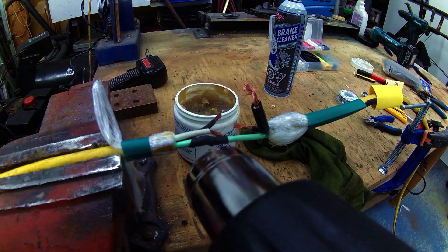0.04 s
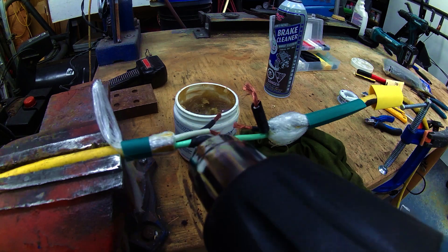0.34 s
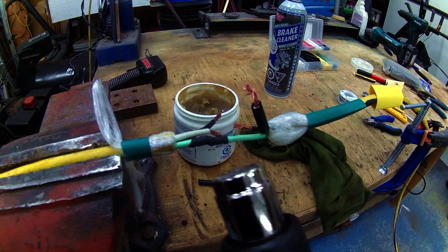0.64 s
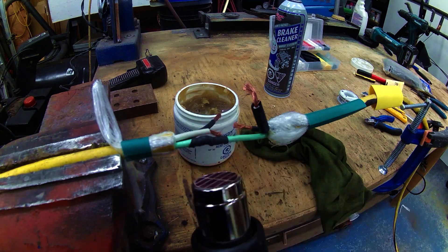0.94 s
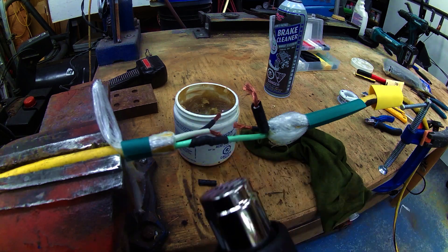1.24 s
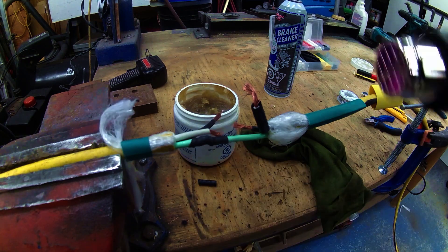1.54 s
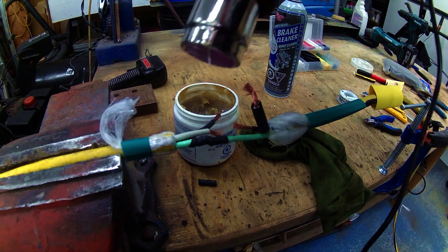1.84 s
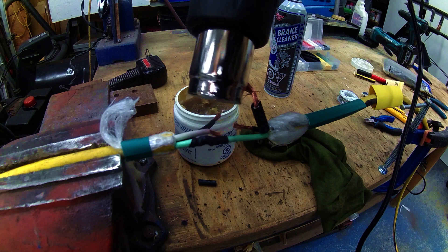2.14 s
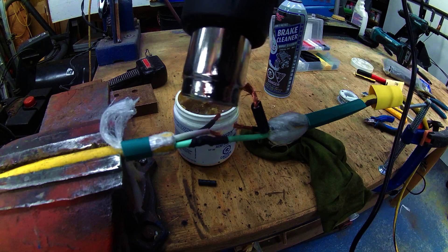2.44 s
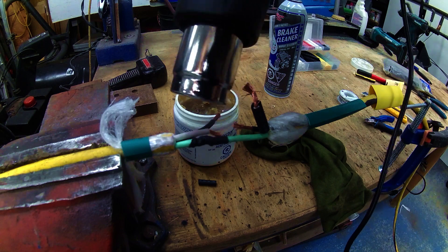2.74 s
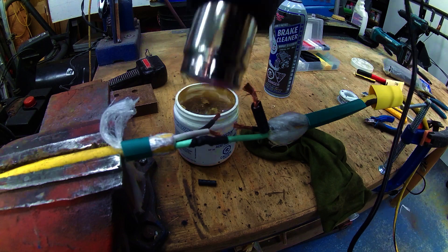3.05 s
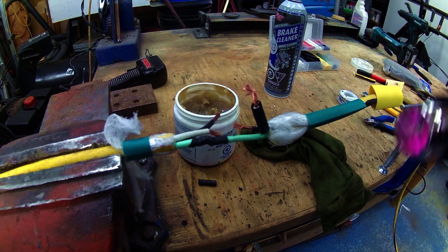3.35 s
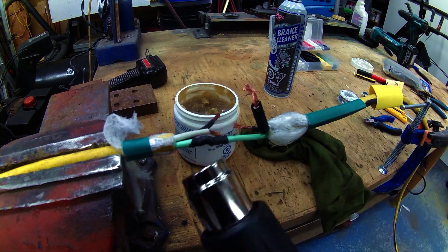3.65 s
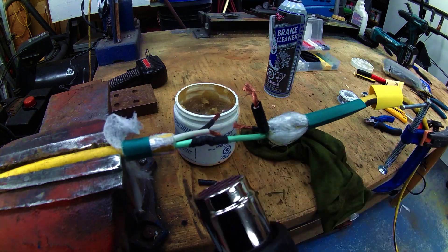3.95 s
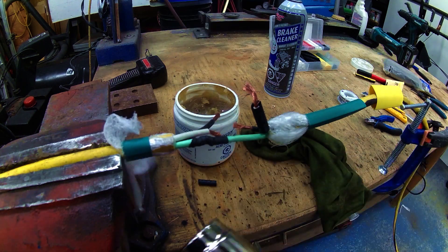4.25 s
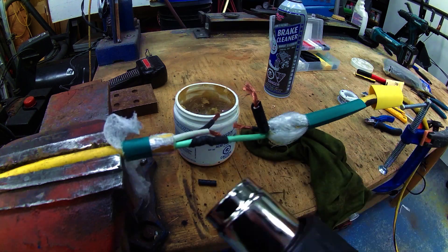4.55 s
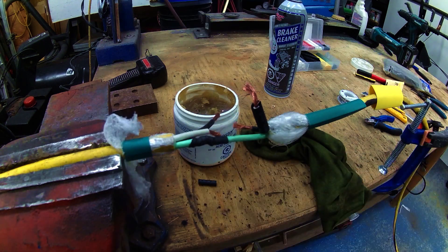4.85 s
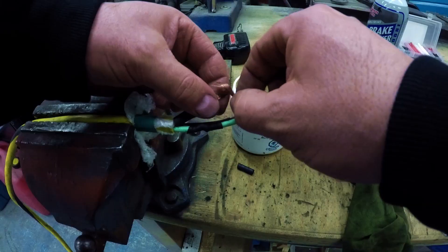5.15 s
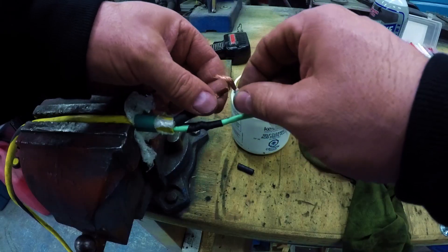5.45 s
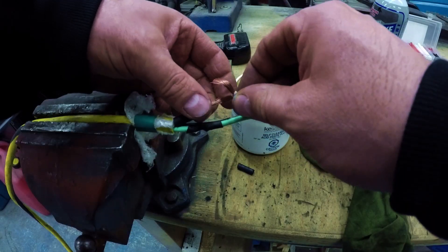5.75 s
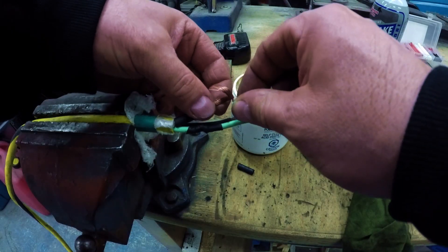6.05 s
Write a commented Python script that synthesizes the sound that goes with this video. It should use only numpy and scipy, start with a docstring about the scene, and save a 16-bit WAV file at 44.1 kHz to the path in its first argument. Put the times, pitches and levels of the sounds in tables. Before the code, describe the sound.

Close up at a workbench, hot air hisses from a heat gun while its small fan whines faintly, wavering in pitch at a steady beat. The gun is waved around, so the rush changes colour and turns sharper whenever it points at the microphone. It stops suddenly near the end, leaving only a soft, throbbing electrical hum and low workshop rumble.

```python
"""Heat gun at a workbench

A heat gun is waved over a cable: air rushes through its barrel and the fan whines, surging at a steady beat.
How it is held (aim, closeness) sets how much of each part reaches the microphone. The sound then cuts abruptly
to the quiet workshop, with its hum, rumble and air, and the level then rises steadily."""
import sys
import numpy as np
from scipy import signal
from scipy.fft import rfft, irfft, next_fast_len
from scipy.io import wavfile
from scipy.ndimage import map_coordinates

SR = 44100
rng = np.random.default_rng(int(sys.argv[2]) if len(sys.argv) > 2 else 0)


def master_out(mix):
    """Clip the mix to full scale and print it as 16-bit PCM to the path in sys.argv[1]."""
    frames = np.transpose(np.atleast_2d(mix))
    ceiling = np.clip(frames, -1, 1)
    pcm = np.round(ceiling * 32767).astype(np.int16)
    wavfile.write(sys.argv[1], SR, pcm)


N = 272979
CUT_S = 5.185  # the sound cuts abruptly from the running gun to the quiet room
# A lobe is the range of aims where a sound is beamed at the microphone: centre/deg, half-width/deg
MAIN_LOBE, JET_LOBE, FIZZ_LOBE, WHINE_LOBE = (-2.5, 28), (0, 65), (-28, 39), (-63, 16)

# The tone colour of each stream of air: f/Hz, level/dB
BARREL_AIR = [(330, -18), (950, -16.5), (1650, -10.5), (2080, -21), (2450, 0.5), (3200, -5.0), (3500, -9.5),
              (4200, -2.0), (5000, -20.5), (6700, -18.5), (7700, -31.5), (9500, -20), (12000, -32.5),
              (15500, -38)]  # blown through the barrel
INTAKE_AIR = [(600, -22), (1050, -22), (1750, -0.5), (2300, -9), (2650, -17), (3400, -15.5), (4300, -9),
              (5100, -11.5), (5900, -31), (15500, -38)]  # sucked in at the vents, heard when the housing is near
JET_AIR = [(900, -21.5), (1800, -29), (2200, 1), (2900, -10), (3600, -11.5), (4500, -33), (5800, -20.5),
           (7500, -18.5), (10500, -52), (15500, -42)]  # the jet, heard when the nozzle swings past
EDGE_FIZZ = [(6000, -40), (10500, -19), (11800, -8), (12900, 0), (14200, -2), (15500, -9)]  # fine fizz from the nozzle's edge
def airflow(flutter_db=0.48, bass_hz=85):
    """Swirling air makes four kinds of rushing noise, each fluttering a little."""
    parts = [(BARREL_AIR, level_of("barrel")), (INTAKE_AIR, level_of("intake")),
             (JET_AIR, level_of("jet", JET_LOBE)), (EDGE_FIZZ, level_of("fizz", FIZZ_LOBE))]
    air = sum(rush(colour) * amp(level_db + flutter_db * wobble(25.07)) for colour, level_db in parts)
    # so small an opening gives off little bass
    return filtered(air, lambda hz: hz ** 2 / np.sqrt(hz ** 4 + bass_hz ** 4))


# The pitches at which air rings inside the barrel: f/Hz, width/Hz, level/dB
BARREL_RINGS = [(1250, 75, -48.5), (2552, 134, -31.5), (3024, 74, -39), (4240, 210, -34.5),
                (6800, 480, -43.5)]
def barrel_ring():
    """The flow sets the air in the barrel ringing faintly, which makes the rush hollow."""
    def peaks(hz):
        return sum(amp(db) * (1j * hz * width / (centre ** 2 - hz ** 2 + 1j * hz * width)) ** 2
                   for centre, width, db in BARREL_RINGS)
    level_db = level_of("barrel")
    return filtered(rng.standard_normal(N), peaks) * amp(level_db - np.median(level_db))


# The fan's families of tones: multiple of the shaft speed, level/dB
FAN_HUM = [(1, -0.5), (2, -9.5), (3, -5)]
FAN_BLADES = [(5, -27), (6, -28.5), (7, -28), (8, -40), (9, -50), (18, -43.5), (20, -45.5)]
FAN_WHINE = [(10, -0.43)]
FAN_WHISTLE = [(12, 0)]
FAN_OVERTONES = [(13, -9.5), (14, -4.5), (15, 0.5)]  # these carry when the gun is overhead
FAN_SIZZLE = [(23, -11), (24, -4), (25, 2.5), (26, -10.5), (27, -16)]
MOTOR_BUZZ = [(9, 1), (13, -1), (21, -10), (22, -8), (23, -4), (24, -3), (26, -4)]  # escapes through the vents
def fan(jitter_hz=0.42, shimmer_db=1.78, blur_rad=.018):
    """The spinning fan sings; swirling air makes each tone shimmer and blurs the high ones."""
    speed = shaft_speed() + jitter_hz * wobble(70)
    angle = 2 * np.pi * np.cumsum(speed) / SR
    families = [(FAN_HUM, level_of("hum")), (FAN_BLADES, level_of("barrel")),
                (FAN_WHINE, level_of("whine", WHINE_LOBE)), (FAN_WHISTLE, level_of("whistle")),
                (FAN_OVERTONES, level_of("overtones")), (FAN_SIZZLE, level_of("sizzle")),
                (MOTOR_BUZZ, level_of("buzz"))]
    tones = np.zeros(N)
    for family, level_db in families:
        for multiple, db in family:
            unsteady_angle = angle + blur_rad * wobble(250)
            tone = np.sqrt(2) * np.sin(multiple * unsteady_angle + rng.uniform(0, 2 * np.pi))
            tones += tone * amp(level_db + db + shimmer_db * wobble(30))
    return tones


# The fan's slowly drifting speed, before surges are added: t/s, f/Hz
BASE_SPEED = [(0, 549.1), (.5, 556.5), (1.25, 551), (1.55, 550.4), (1.9, 556), (2.4, 552.7), (3.3, 552.4),
              (3.7, 555.2), (4.4, 552.7), (5.15, 558)]
def shaft_speed(surge_at_s=.3564, every_s=.4158, rise_s=.068, sag_s=.16, surge_hz=8.7):
    """Turns per second: at a steady beat the fan speeds up quickly, then sags slowly."""
    since = (np.arange(N) / SR - surge_at_s) % every_s
    surge = np.minimum(since / rise_s, 1) * np.exp(-np.maximum(since - rise_s, 0) / sag_s)
    return curves(BASE_SPEED)[0] + surge_hz * surge


# The nozzle's hiss when held low, facing the microphone and overhead: f/Hz, width/share of f, level/dB
HISS_LOW, HISS_FACING, HISS_OVERHEAD = (10350, 0.089, -44), (6600, 0.16, -37), (9600, .13, -45)
HISS_LOBE, RIM_LOBE = (-10, 36), (-40, 17)  # in the second, the nozzle's rim shades the hiss
def nozzle_hiss(close_db=-2.5, aside_db=-2, rim_db=-11.5, near_shift_hz=-700, edge_steepness=3):
    """A band of hiss that drops and widens as the nozzle sweeps past."""
    hz, t, noise = signal.stft(rng.standard_normal(N), SR, nperseg=512)
    holding = (*poses(), facing(HISS_LOBE), facing(RIM_LOBE))
    overhead, close, aside, aimed, rim = [np.interp(t, np.arange(N) / SR, c) for c in holding]
    turned_away = np.outer(HISS_LOW, 1 - overhead) + np.outer(HISS_OVERHEAD, overhead)
    centre_hz, width, db = turned_away * (1 - aimed) + np.outer(HISS_FACING, aimed)
    centre_hz += near_shift_hz * (close + aside)  # a nearby housing pulls the band down
    widths_away = np.abs(np.log((hz[:, None] + 1) / centre_hz) / width)
    band = np.exp(-.5 * widths_away ** edge_steepness)
    gain = amp(db + rim_db * rim + close_db * close + aside_db * aside)
    return signal.istft(noise * band * gain, SR, nperseg=512)[1][:N]


# The whole gun grows louder and softer in the hand: t/s, level/dB
HAND_LEVEL = [(0, -2.5), (.15, -.5), (1.3, -.5), (1.62, .5), (2.05, 1.04), (2.3, 0), (3.3, 0.45),
              (3.55, -1), (3.75, 0.7), (3.87, -1.2), (4, 0), (4.8, 0.14)]
# Each part held low, and what poses add: level/dB, overhead/dB, close/dB, aside/dB, in its lobe/dB
PART_LEVELS = { "barrel": (-24.5, 0.1, 0, -9, 0), "intake": (-37, 1, 12.5, 8, -2),
               "jet": (-38, 0, -1, 4, 13.5), "fizz": (-56, -2, 5, 4, 13), "hum": (-57.5, 0, 11, 0, -3),
               "whine": (-58.5, 8, 8, -9, 4.5), "overtones": (-75, 13.5, 6, 4, -5),
               "whistle": (-54, .5, -8, -13, 9), "sizzle": (-70, 4.5, 15.5, 5, -2),
               "buzz": (-81, 1, 22, 5, -1), }
def level_of(part, lobe=MAIN_LOBE):
    """A part's level in dB follows the way the gun is held."""
    low_db, overhead_db, close_db, aside_db, facing_db = PART_LEVELS[part]
    overhead, close, aside = poses()
    pose_db = overhead_db * overhead + close_db * close + aside_db * aside
    return curves(HAND_LEVEL)[0] + low_db + pose_db + facing_db * facing(lobe)


# The swing from low (-90) past the microphone (0) to overhead (90) and back: t/s, aim/deg
SWING = [(1.42, -91), (1.59, -60), (1.67, -30.5), (1.78, -3), (1.96, 36), (2.17, 88), (3.25, 91), (3.4, 38),
         (3.55, -4), (3.62, -30), (3.7, -58), (3.9, -78), (4.2, -86), (4.5, -78)]
def facing(lobe):
    """How squarely a lobe points at the microphone, 0-1."""
    centre, half_width = lobe
    return np.exp(-((curves(SWING)[0] - centre) / half_width) ** 2)


# The housing comes up to the microphone, then passes by again: t/s, closeness (0-1)
CLOSENESS = [(0, 0.2), (.2, 0.76), (.45, 0.95), (.6, 0.9), (.7, 0.38), (1, 0), (1.35, 0), (1.55, 0.24),
             (1.72, 0.08)]
def poses(overhead_from_deg=62, aside_at_s=4.87, aside_takes_s=0.19):
    """How far the gun is overhead, close, and drawn aside (vents to the microphone), each 0-1."""
    overhead = np.clip(curves(SWING)[0] / overhead_from_deg, 0, 1)
    aside = np.clip((np.arange(N) / SR - aside_at_s) / aside_takes_s, 0, 1)
    return overhead, curves(CLOSENESS)[0], aside


def with_bench_echo(air, echo_db=-17):
    """Adds a weak echo off the bench; its path drifts with the hand, gently colouring the rush."""
    delay_s = .0023 + .00015 * wobble(1.5)
    echo = map_coordinates(air, [np.arange(N) - delay_s * SR])
    return air + amp(echo_db) * echo


# Light scuffs as the gun is swung round: t/s, half-length/s, level/dB
SCUFFS = [(1.905, 0.016, -41.5), (3.539, .0008, -32.5)]
# Their tone colour: f/Hz, level/dB
SCUFF_COLOUR = [(3000, -30), (7000, -8), (10000, 3), (12500, -4), (15000, -14)]
def scuffs():
    """Handling the gun makes short, bright bursts of noise."""
    t = np.arange(N) / SR
    bursts = sum(amp(db) * np.exp(-((t - at_s) / half_s) ** 2) for at_s, half_s, db in SCUFFS)
    return rush(SCUFF_COLOUR) * bursts


# Faint low tones under the rush: f/Hz, level/dB
DRONE_TONES = [(75, -74), (143.6, -69), (150, -68.5), (279, -71), (287.4, -67), (300, -69)]
def drone():
    """Steady tones, so close in pitch that they throb against each other."""
    t = np.arange(N) / SR
    return sum(amp(db) * np.sqrt(2) * np.sin(2 * np.pi * hz * t + rng.uniform(0, 2 * np.pi))
               for hz, db in DRONE_TONES)


# Hum from a running motor and the mains: f/Hz, left level/dB, right level/dB
ROOM_HUM = [(58.6, -57.5, -43.5), (114.7, -59, -49), (119.8, -71, -44.5), (173, -74.5, -72),
            (228, -72, -67), (240, -74, -62.5), (360, -89, -56)]
# The tone colours of the room's rumble and air: f/Hz, level/dB
ROOM_RUMBLE = [(12, -28), (24, -5), (35, -4), (48, -11), (75, -17), (95, -15), (140, -19.5), (230, -21),
               (330, -31), (600, -50), (2000, -77)]
ROOM_AIR = [(30, -3), (100, -6), (230, -3.5), (400, -8.5), (700, -13), (1500, -21.5), (3000, -32),
            (5000, -35.5), (8500, -32), (11000, -36.5), (15000, -53)]
# How alike that air sounds left and right: f/Hz, likeness (1 same, -1 opposite)
AIR_LIKENESS = [(60, .3), (130, -0.1), (290, -0.77), (1400, -0.59), (3100, 0.13), (15000, -0.039)]
def workshop(air_db=-33, rumble_db=(-25, -16), waver_db=1, throb_s=5.71, start_db=-9, swell_db_per_s=14):
    """Motor and mains tones throb over rumble and airy noise; all swell after the cut."""
    t = np.arange(N) / SR
    from_throb = t - throb_s  # the tones line up here, and throb about five times a second
    hum = np.zeros((2, N))
    for hz, left_db, right_db in ROOM_HUM:
        tone = np.sqrt(2) * np.sin(2 * np.pi * hz * from_throb)
        hum += amp([[left_db], [right_db]]) * tone * amp(waver_db * wobble(7))
    rumble = np.outer(amp(rumble_db), rush(ROOM_RUMBLE))  # left, right
    spread = lambda hz: np.arccos(np.clip(along(AIR_LIKENESS, hz), -1, 1)) / 2
    shared = filtered(rush(ROOM_AIR), lambda hz: np.cos(spread(hz)))
    opposed = filtered(rush(ROOM_AIR), lambda hz: np.sin(spread(hz)))
    air = amp(air_db) * np.array([shared + opposed, shared - opposed])
    since_cut = np.maximum(t - CUT_S, 0)
    return (hum + rumble + air) * amp(start_db + swell_db_per_s * since_cut)


def amp(db):
    """Turns decibels into a number to multiply by."""
    return 10 ** (np.asarray(db) / 20)


def along(points, hz):
    """Reads between rows of (f/Hz, value), spaced like musical pitch."""
    row_hz, values = np.transpose(points)
    return np.interp(np.log(hz + 1), np.log(row_hz + 1), values)


def curves(rows):
    """Each column after the time, read at every sample."""
    times, *columns = np.transpose(rows)
    return [np.interp(np.arange(N) / SR, times, column) for column in columns]


def wobble(rate):
    """A smooth curve through `rate` random values a second."""
    return map_coordinates(rng.standard_normal(int(N * rate / SR) + 4), [np.arange(N) * rate / SR])


def filtered(sound, response):
    """Turns each frequency of a sound up or down by response(hz)."""
    size = next_fast_len(N + SR // 2)
    return irfft(rfft(sound, size) * response(np.fft.rfftfreq(size, 1 / SR)), size)[..., :N]


def rush(colour):
    """Rushing noise with the given tone colour."""
    return filtered(rng.standard_normal(N), lambda hz: amp(along(colour, hz)))


def scene(cut_takes_s=0.0019):
    """The sound cuts from the running gun, dead centre, to the wide, quiet room."""
    before_cut = np.clip((CUT_S - np.arange(N) / SR) / cut_takes_s + .5, 0, 1)
    gun = with_bench_echo(airflow() + barrel_ring()) + nozzle_hiss() + fan() + drone() + scuffs()
    return before_cut * gun + (1 - before_cut) * workshop()


def record(dry, top_hz=15720):
    """Removes the very highest treble."""
    return filtered(dry, lambda hz: hz < top_hz)


dry = scene()
out = record(dry)
master_out(out)
```